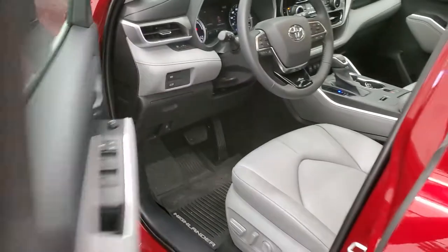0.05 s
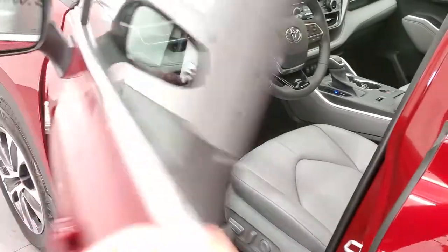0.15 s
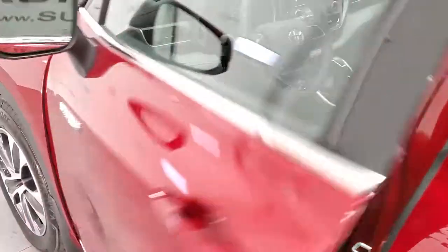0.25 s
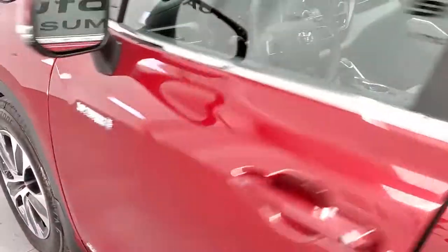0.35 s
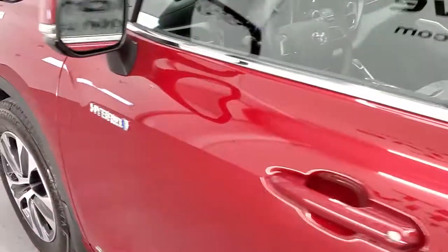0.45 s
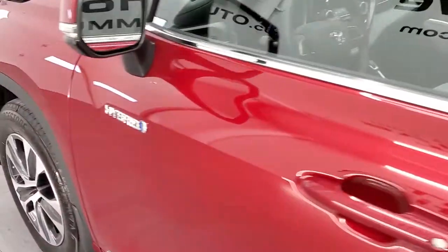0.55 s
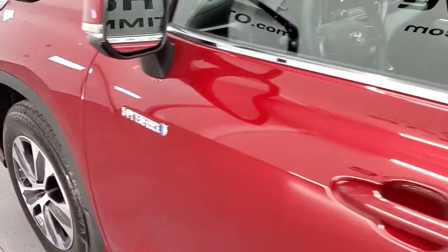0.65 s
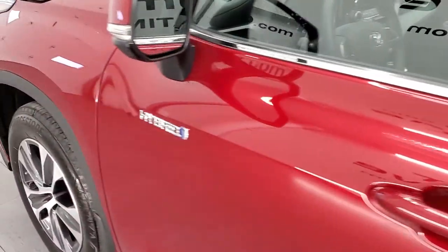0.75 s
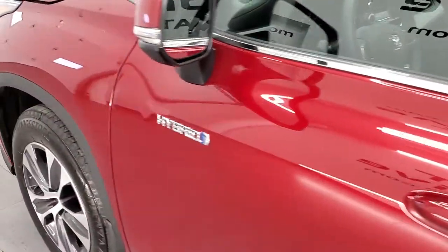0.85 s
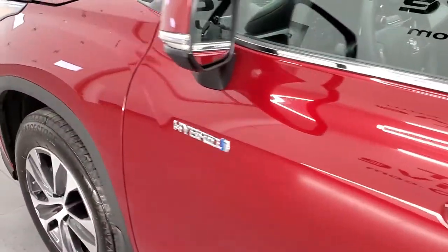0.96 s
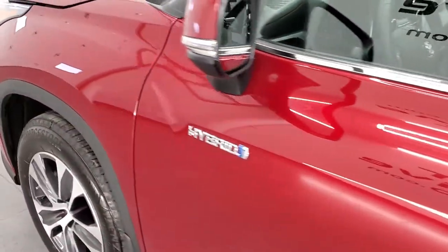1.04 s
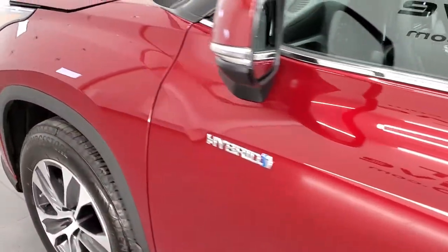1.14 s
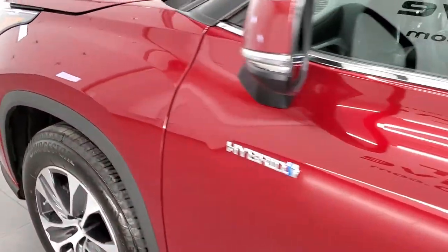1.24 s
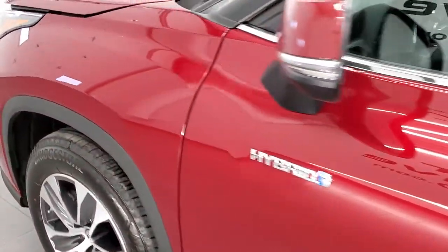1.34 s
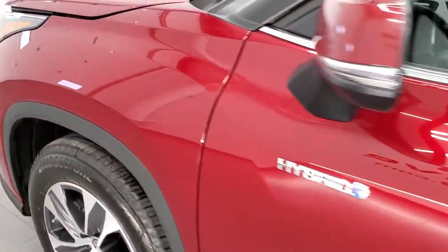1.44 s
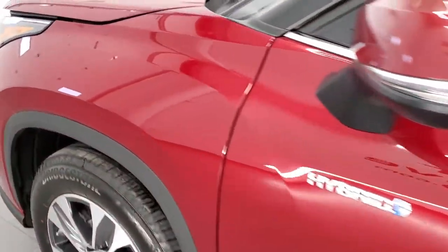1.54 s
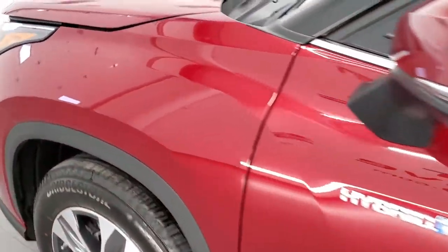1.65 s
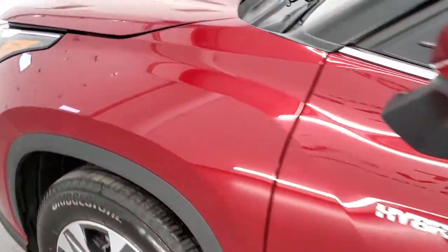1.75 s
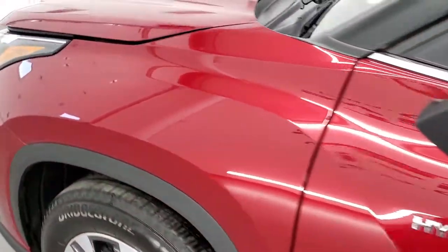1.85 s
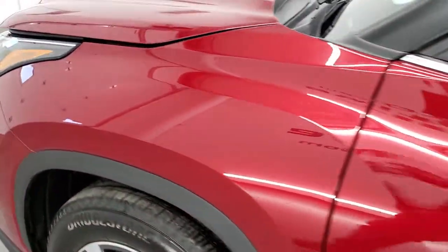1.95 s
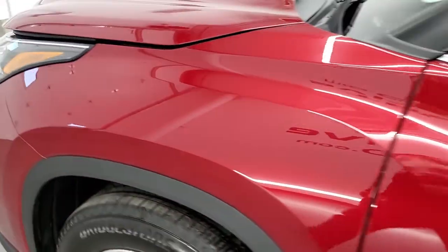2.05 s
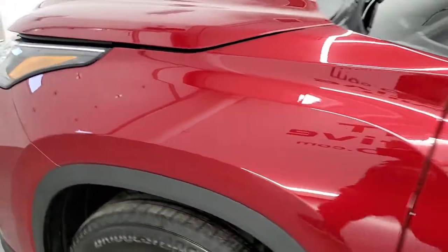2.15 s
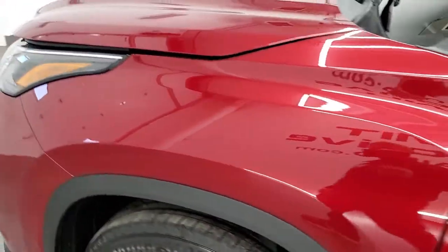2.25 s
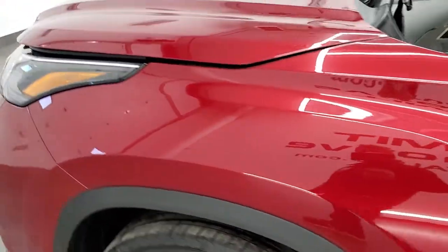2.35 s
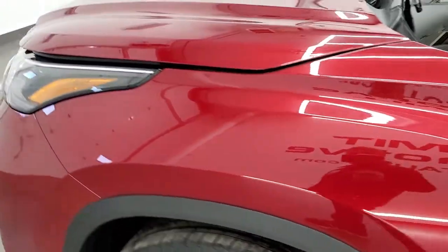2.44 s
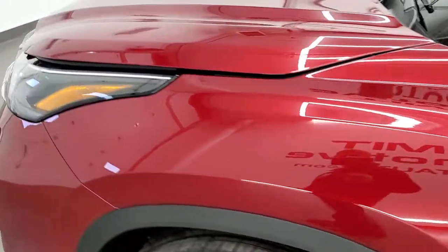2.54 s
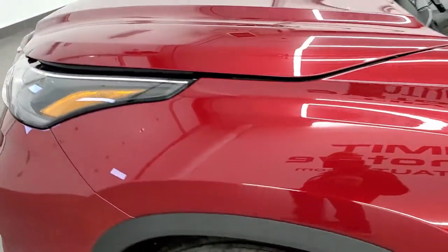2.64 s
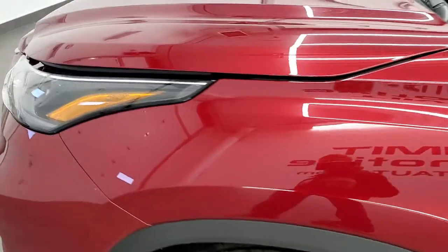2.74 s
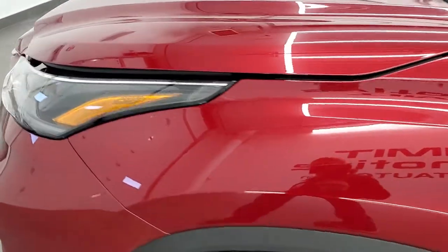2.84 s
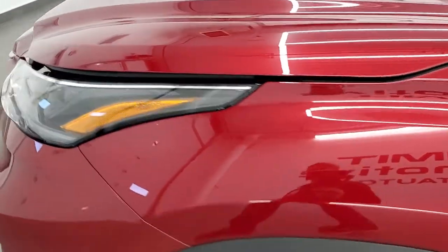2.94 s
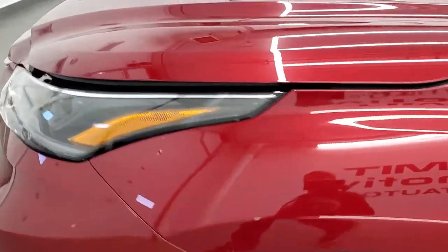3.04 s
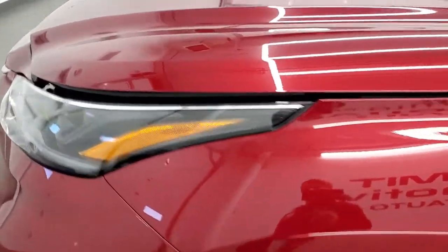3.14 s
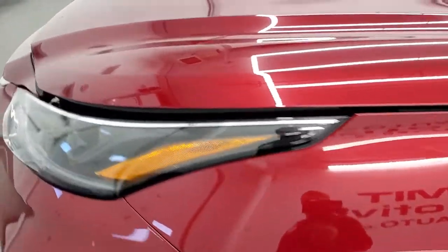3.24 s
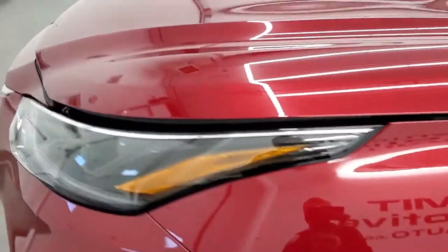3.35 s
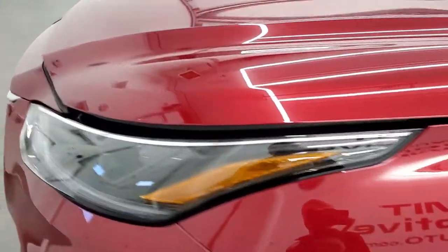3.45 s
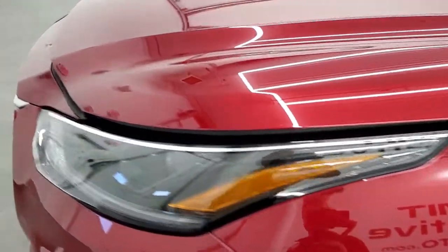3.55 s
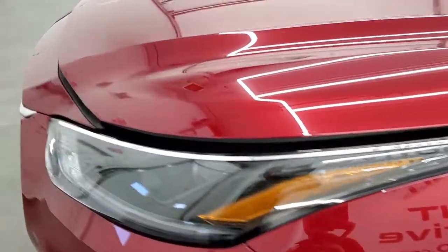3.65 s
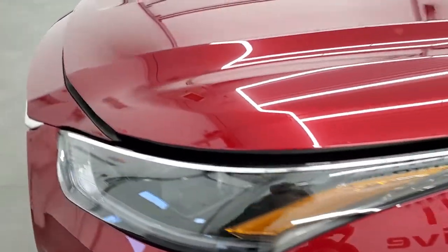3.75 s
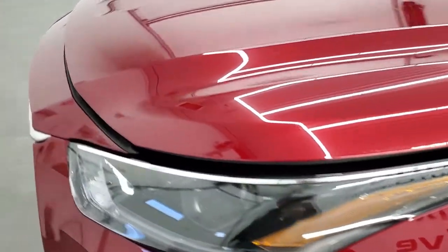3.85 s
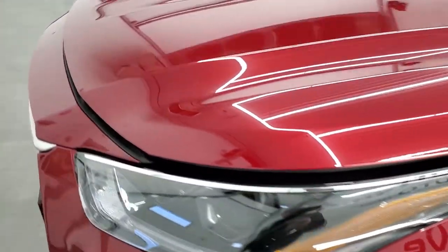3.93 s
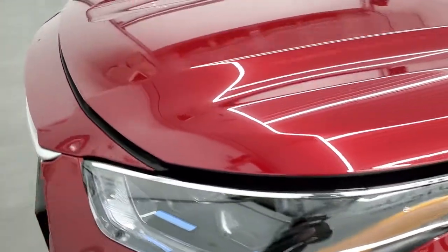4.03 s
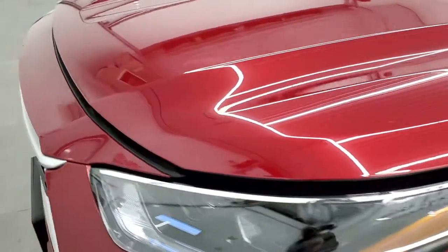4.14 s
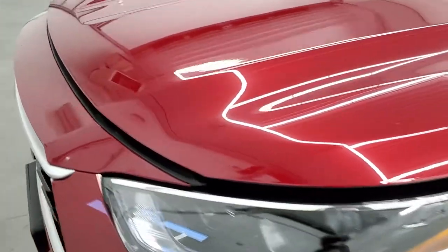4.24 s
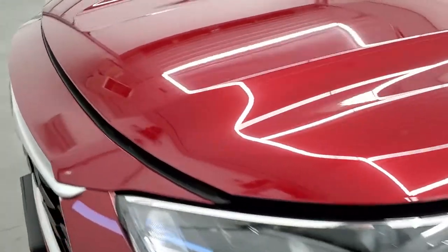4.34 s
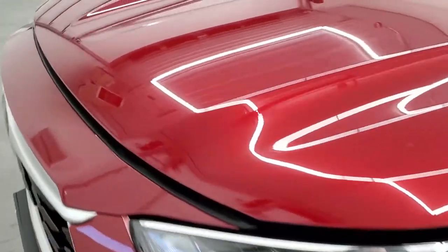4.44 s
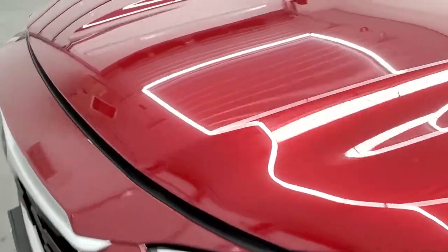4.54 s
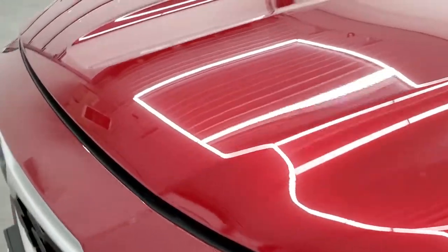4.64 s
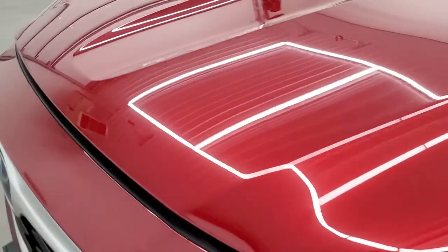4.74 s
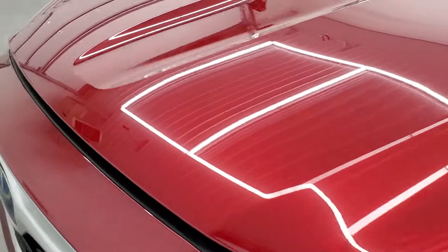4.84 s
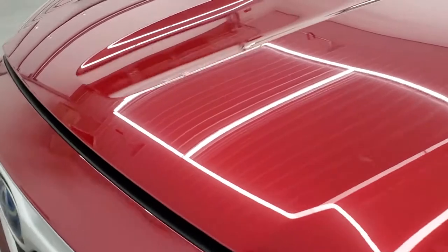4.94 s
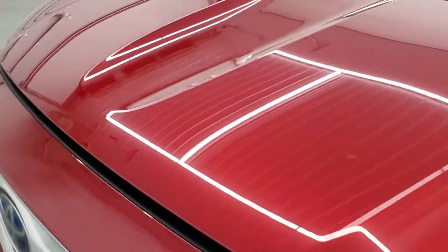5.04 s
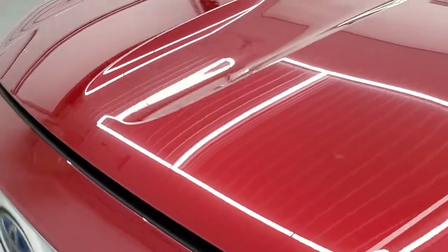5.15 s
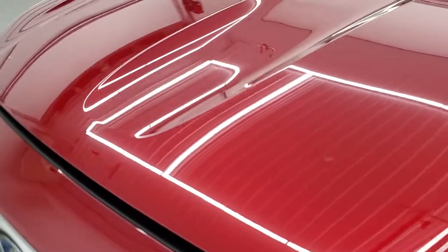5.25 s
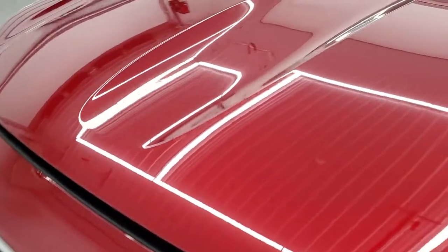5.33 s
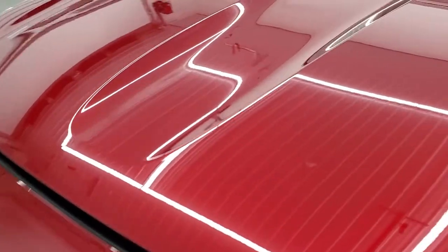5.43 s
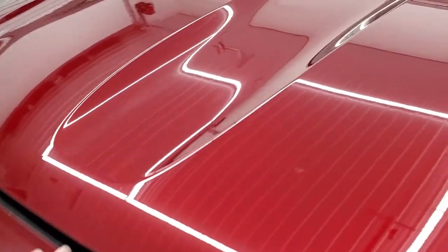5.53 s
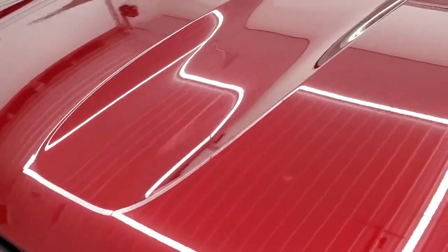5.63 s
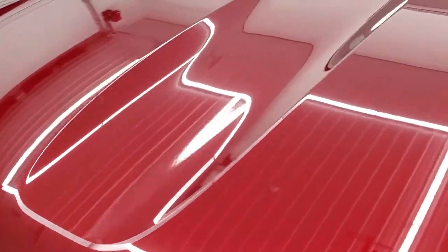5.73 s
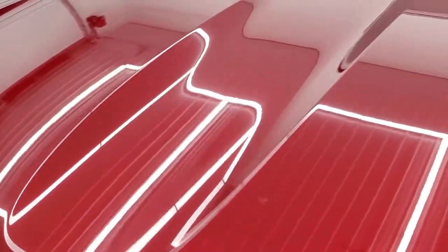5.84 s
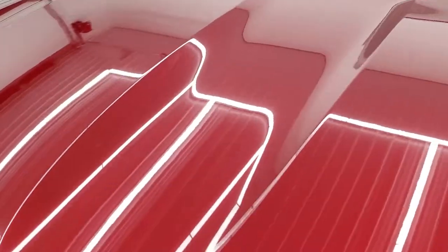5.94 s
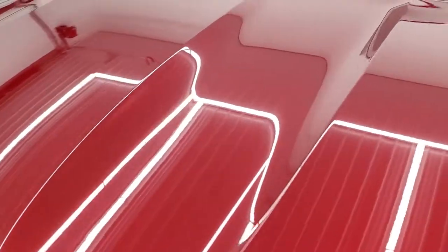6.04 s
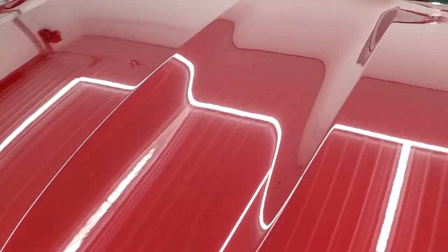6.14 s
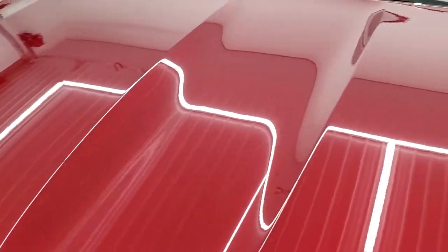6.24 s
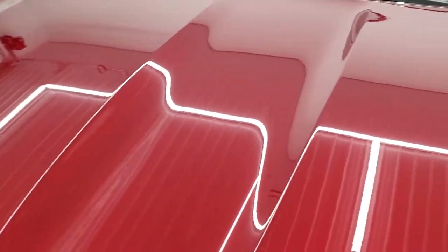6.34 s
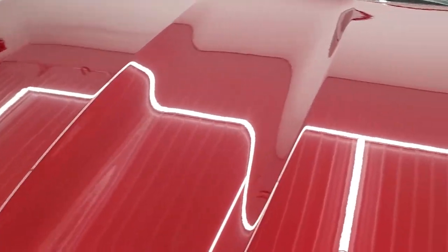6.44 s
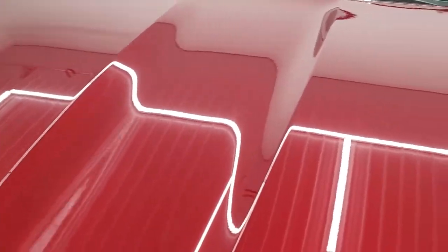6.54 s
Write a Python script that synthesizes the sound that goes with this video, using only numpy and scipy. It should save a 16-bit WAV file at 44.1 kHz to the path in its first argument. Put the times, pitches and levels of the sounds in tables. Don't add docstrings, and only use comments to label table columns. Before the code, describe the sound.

Heavy car door slam, boomy and long-ringing in a large room with fan hum, followed by soft sole scuffs, rubber creaks and closing handling bumps.

```python
import sys
import numpy as np
from scipy import signal
from scipy.fft import rfft, irfft, next_fast_len
from scipy.io import wavfile
from scipy.ndimage import uniform_filter1d, map_coordinates

SR = 44100
rng = np.random.default_rng(int(sys.argv[2]) if len(sys.argv) > 2 else 0)


def store_wav(level_fs):
    pcm = np.round(np.clip(np.atleast_2d(level_fs), -1, 1) * 32767)
    wavfile.write(sys.argv[1], SR, pcm.T.astype(np.int16))


def rack_gain(trim_db):
    fader = np.asarray(trim_db, float)
    return 10 ** (fader / 20)


N = 290442
T = np.arange(N) / SR


def unit(x):
    return x / np.sqrt(np.mean(x ** 2) + 1e-20)


def along(points, hz):
    f, v = np.transpose(points)
    return np.interp(np.log(hz + 1), np.log(f + 1), v)


def curve(rows, column=1, outside=-120):
    rows = np.array(rows)
    return np.interp(T, rows[:, 0], rows[:, column], outside, outside)


def wobble(rate, length=N):
    knots = rng.standard_normal(int(N * rate / SR) + 4)
    return map_coordinates(knots, [T[:length] * rate], order=2)


def filtered(x, response):
    m = next_fast_len(x.shape[-1] + SR // 8, real=True)
    spectrum = rfft(x, m) * response(np.fft.rfftfreq(m, 1 / SR))
    return irfft(spectrum, m)[..., :x.shape[-1]]


def colour(spectrum):
    return lambda hz: rack_gain(along(spectrum, hz))


def peaks(rows):
    def gain(f):
        return np.sqrt(sum(rack_gain(2 * db) / width / (1 + (2 * (f - hz) / width) ** 2) ** 2
                           for hz, width, db in rows))
    return gain


# (frequency [Hz], left-right likeness [-1 to 1])
ALIKE = [(60, 0.97), (130, 0.87), (290, 0.89), (640, 0.39), (1410, -0.23), (3100, -0.034), (6820, -0.1),
         (15000, -0.018)]


def diffuse(gain, length=N, alike=ALIKE):
    def mid_side(hz):
        turn = np.arccos(np.clip(along(alike, hz), -1, 1)) / 2
        return gain(hz) * [np.cos(turn), np.sin(turn)]
    mid, side = filtered(rng.standard_normal((2, length)), mid_side)
    return unit(np.array([mid + side, mid - side]))


def patchy(x, depth_db):
    z = signal.stft(x, nperseg=512)[2]
    field = uniform_filter1d(rng.standard_normal(z.shape[1:]), size=4, axis=0)
    field = uniform_filter1d(field, size=9, axis=1)
    return signal.istft(z * rack_gain(depth_db * unit(field)), nperseg=512)[1][:, :N]


def strokes(rows):
    s, db, rise, fall = np.transpose(rows)[:, :, None]
    late = T[::64] - s
    level = rack_gain(db + 20 * np.minimum(late / np.abs(rise), -late / np.abs(fall)))
    return np.interp(T, T[::64], np.sqrt(np.sum(level ** 2, axis=0)))


def add(track, s, sound, pan_db):
    spot = track[:, round(s * SR):][:, :len(sound)]
    spot += rack_gain([[pan_db / 2], [-pan_db / 2]]) * sound[:spot.shape[1]]


def ring(modes, drift, length):
    t = T[:length]
    drift = drift * np.minimum(t / 0.099, 1)
    return sum(rack_gain(db - 60 * t / t60) * np.sin(2 * np.pi * hz * t + drift * wobble(10.2, length))
               for hz, db, t60 in modes)


def impacts(rows, t60, puff_db):
    track, t = np.zeros((2, N)), np.arange(SR // 5) / SR
    for s, db, hz, *pan_db in rows:
        note = rack_gain(-60 * t / t60) * np.sin(2 * np.pi * hz * t)
        dull = np.convolve(rng.standard_normal(len(t)), np.hanning(28) / 14, 'same')
        puff = rack_gain(puff_db + 9.5 - 60 * t / 0.038) * dull
        onset = 1 - np.exp(-t / 0.00049)
        add(track, s, rack_gain(db - 3.5) * (note + puff) * onset, sum(pan_db))
    return track


# (time [s], level [dB])
RECOVERY = [(0, 5), (.36, -4), (.65, -4), (1.3, -2.5), (2.2, -7.5), (4, 1.5), (5.5, 5), (6.59, 6.5)]


def gain_recovery_db():
    return curve(RECOVERY)


# (frequency [Hz], density [dB per Hz])
RUMBLE = [(12, -42), (20, -10), (54, -6.5), (129, -14.5), (193, -24), (327, -29), (366, -30.5),
          (400, -28.5), (520, -48), (880, -120)]
# (frequency [Hz], width [Hz], level [dB])
FAN_LINES = [(45.6, 48, -8), (68, 72, 1), (164.4, 5.4, -7)]


def duct_rumble():
    steady = rack_gain(-49 + 0.55 * gain_recovery_db())
    draught_db, draught_fall_s = -36.5, 0.63
    draught = rack_gain(draught_db - 20 * T / draught_fall_s)
    rumble = rack_gain(1.6 * wobble(4.883)) * diffuse(colour(RUMBLE))
    lines = rack_gain(-8.5) * diffuse(peaks(FAN_LINES))
    return (steady + draught) * (rumble + lines)


# (frequency [Hz], density [dB per Hz])
AIR = [(120, -69), (200, 2.5), (323, -8.5), (366, -8.5), (403, -7.5), (488, -1), (908, 0), (3000, -7.5),
       (5240, -27), (7090, -26), (9000, -36), (11700, -91), (19800, -120)]


def far_air():
    return rack_gain(-60 - 0.17 * gain_recovery_db() + 0.25 * wobble(1.7)) * diffuse(colour(AIR))


# (frequency [Hz], density [dB per Hz])
HISS = [(2350, -22), (4000, -2.5), (5260, -19), (6530, -20), (7070, -27.5), (7190, -20.5), (9030, -29),
        (11200, -17), (15600, -12.5)]


def microphone_hiss():
    return rack_gain(-82.5 + gain_recovery_db() + 8.0) * diffuse(colour(HISS))


# (frequency [Hz], level [dB], unsteadiness [dB])
FAN_TONES = [(83, -53, 3), (124.4, -57, 1)]
# (time [s], level [dB])
NEAR_FAN = [(0, -33), (1.8, -0.5), (2.4, -15), (2.9, -3), (3.5, 0.5), (4, -9), (4.6, 6), (5.4, 3), (5.8, 2),
            (6.3, 5), (6.59, 6)]
# (time [s], level [dB])
FAN_SWELL = [(0, -19), (1.6, -11), (2, -4.5), (2.9, 0), (3.5, 1.5), (4, -8), (4.3, 5.5), (5.75, 6),
             (6, 1.5), (6.59, 2)]


def fan_hum():
    hum = np.zeros(N)
    for (hz, db, swing_db), near in zip(FAN_TONES, [NEAR_FAN, FAN_SWELL]):
        level = np.sqrt(2) * rack_gain(db + curve(near) + swing_db * wobble(6.5))
        cycles = hz * np.cumsum(1 + 0.0121 * wobble(5)) / SR
        hum += level * np.sin(2 * np.pi * cycles)
    return hum


# (frequency [Hz], level [dB])
WHINE = [(2487, -70), (6842, -79)]
# (time [s], level [dB])
LAMP = [(0, -6), (1, -8), (1.8, -4), (2.6, -2), (3.7, 2), (4.2, 0), (4.8, 1), (5.3, 0.5), (5.83, 6),
        (6.1, 0), (6.2, 1), (6.59, -1)]


def ballast_whine():
    whine = np.zeros((2, N))
    ears = np.array([[0], [1.5]])
    for hz, db in WHINE:
        phase = 2 * np.pi * hz * T + .6 * wobble(12) + ears
        whine += rack_gain(db + 3.5 * wobble(9)) * np.sin(phase)
    return rack_gain(curve(LAMP)) * whine


# (time [s], level [dB])
SHUDDER = [(0.0, -40), (0.052, -23.5), (0.074, -34), (0.13, -28.5), (0.248, -37.5), (0.27, -34),
           (0.37, -36.5), (.39, -70)]


def door_shudder():
    shell_hz = 42.9
    return np.sqrt(2) * rack_gain(curve(SHUDDER)) * np.sin(2 * np.pi * shell_hz * T)


# (time [s], peak [dB], rise [s], fall [s per 20 dB])
BRUSHES = [(0, -71.5, .1, 0.5), (0.2, -67.5, 0.36, 0.4), (1.4, -75, 0.063, 0.9), (1.95, -76, .1, 2),
           (2.24, -69, .03, .4), (2.31, -72, .1, .5), (2.87, -71, 0.106, 1.1), (2.98, -72.5, .04, 0.6),
           (3.45, -74.5, 0.16, 0.5), (3.55, -69.5, 0.088, 1), (4.22, -70, 0.088, 0.3), (4.35, -72, 0.2, 1),
           (4.78, -70, 0.036, 0.2), (4.87, -77, .08, 4), (4.98, -61.5, 0.15, 0.54),
           (5.17, -74.5, 0.76, 0.8), (5.57, -68.5, 0.2, 1), (5.85, -70, .15, 2), (5.97, -63, 0.05, 0.25),
           (6.08, -70, .1, .5), (6.2, -70, 0.18, 0.5), (6.47, -67, .3, -0.1)]
# (frequency [Hz], density [dB per Hz])
CLOTH = [(1760, -25.5), (3000, -17), (3260, -20), (4060, -1.5), (6500, -2.5), (7990, -0.5), (9240, -16),
         (11600, -7), (15600, -8.5)]


def cloth_rustle():
    grain = rack_gain(1.2 * wobble(40) + 1.3 * wobble(560))
    return rack_gain(5.5) * strokes(BRUSHES) * unit(grain * diffuse(colour(CLOTH)))


# (time [s], peak [dB], pitch [Hz], left-right [dB])
KNOCKS = [
    (0.033, -24.5, 288, 0.5),
    (.034, -36, 480, 0),
    (.09, -40, 350, 0),
    (.047, -30, 150, -3),
    (5.977, -29, 360, 5),
    (6.199, -38, 388, 4),
    (6.253, -40.5, 427, 6),
    (6.365, -34, 124, -1),
    (6.472, -35.5, 430, -1),
    (6.5, -32, 410, -1),
]


def hand_knocks():
    return impacts(KNOCKS, t60=0.067, puff_db=-17.5)


# (frequency [Hz], t60 [s])
HALL_T60 = [(60, 1.1), (200, 0.79), (300, 2.15), (500, 2.53), (1000, 2.97), (2000, 3.17), (4300, 2.77),
            (5500, 1.87), (7800, 1.47), (9200, 0.88), (12000, 0.59)]
# (frequency [Hz], level [dB])
HALL_TONE = [(40, -28), (150, -4.5), (215, 2.5), (260, -2), (400, -7.5), (700, -13), (1050, -19),
             (1180, -25.5), (1350, -20), (1900, -19.5), (3000, -28), (4500, -32.5), (5200, -37),
             (7800, -37.5), (9200, -45), (13000, -51)]


def hall(x, tilt_db):
    hz, t, z = signal.stft(diffuse(colour(HALL_TONE), length=2 * SR), SR, nperseg=512)
    decay = rack_gain(-60 * t / along(HALL_T60, hz)[:, None])
    build_up = 1 - np.exp(-t / 0.0072)
    tail = signal.istft(z * decay * build_up, SR, nperseg=512)[1]
    tail = tail / np.linalg.norm(tail[0])
    return rack_gain(tilt_db) * signal.fftconvolve(x[None], tail, axes=1)[:, :N]


# (time [s], peak [dB], rise [s], fall [s per 20 dB])
DRAGS = [(0.04, -60, 0.055, -0.2), (0.132, -70, .08, -1), (1.9, -60.5, 0.082, 3.5),
         (2.237, -50.5, 0.026, 0.28), (2.31, -50, 0.26, 0.63), (2.88, -58.5, 0.32, 0.5),
         (3.05, -60, 0.25, -4), (3.18, -78, .2, -5), (3.555, -53, .03, .3), (3.6, -48, 0.06, .5),
         (3.68, -53, 0.18, 0.84), (4.36, -51, 0.03, .12), (4.42, -56, .08, 1), (4.826, -59.5, 0.0345, -0.5),
         (4.925, -53, .06, .3), (4.962, -43, 0.03, 0.35), (5.01, -46, .1, .6), (5.53, -56.5, 0.64, 0.2),
         (5.57, -58.5, .05, 2), (5.98, -47.5, 0.047, 0.07), (6.26, -58, 0.1, 0.5), (6.48, -62, 0.066, 2)]
# (frequency [Hz], density [dB per Hz])
SOLE = [(590, -67), (1000, -1), (1310, -11), (1480, -1), (2070, 0), (3560, -7.5), (4350, -12.5),
        (7560, -23), (9000, -36.5), (11700, -60.5), (19800, -120)]


def sole_scuffs():
    grain = rack_gain(1.1 * wobble(45) + 1.4 * wobble(300))
    return strokes(DRAGS) * unit(grain * patchy(diffuse(colour(SOLE)), depth_db=1.8))


# (time [s], peak [dB], rise [s], fall [s per 20 dB])
ROLLS = [(0.04, -48.5, 0.11, 0.1), (0.132, -47.5, 0.12, 0.4), (1.95, -55.5, .2, 0.64),
         (2.2, -54.5, 0.11, 0.2), (2.86, -56, .12, 0.6), (3.2, -55, 0.19, 1), (3.48, -55.5, 0.05, 1.2),
         (3.6, -52, 0.22, 0.5), (4.21, -50, 0.1, 0.15), (4.44, -58.5, 0.55, 2.5), (4.826, -54, .015, 0.3),
         (4.97, -49.5, 0.58, .5), (5.53, -58, 0.35, 4), (5.982, -51.5, 0.012, 0.45), (6.2, -58.5, 0.033, 2),
         (6.478, -55.5, .015, 4)]
# (frequency [Hz], density [dB per Hz])
HEEL = [(150, -15), (280, -4.5), (500, 0.5), (900, -4), (1400, -2.5), (2200, -10.5), (4000, -38),
        (8000, -70)]


def heel_rolls():
    return strokes(ROLLS) * unit(rack_gain(1.5 * wobble(45)) * diffuse(colour(HEEL)))


# (time [s], peak [dB], rise [s], fall [s per 20 dB])
SQUEAKS = [
    (.1, -69, .05, .1),
    (.125, -64, .03, .04),
    (.145, -62, .04, .1),
    (.2, -64, .04, .05),
    (.24, -70, .05, .1),
]
# (frequency [Hz], width [Hz], level [dB])
HINGE = [(5810, 300, 1), (7600, 600, -4)]


def hinge_squeak():
    creak = unit(rack_gain(3 * wobble(150, SR)) * diffuse(peaks(HINGE), length=SR))
    return strokes(SQUEAKS) * np.resize(creak.T, (N, 2)).T


# (time [s], peak [dB], pitch [Hz], left-right [dB])
TICKS = [(0.1438, -48, 5900, 7.5), (0.1436, -52, 13600, 6.5), (0.153, -52, 3600, 3),
         (0.186, -49, 12600, 8.5), (0.199, -44, 7900, 6), (0.199, -47, 12600, 9), (0.202, -44, 6500, 2),
         (0.204, -50, 12200, 7), (0.2117, -43, 13800, 9), (0.2155, -49, 12000, 9), (0.291, -53, 4900, 2),
         (0.3575, -50, 13200, -5), (.363, -57, 12500, -3), (0.383, -37, 12000, -3), (.3862, -28, 13700, 0),
         (0.417, -35, 7400, 0), (.455, -44, 7500, 0), (.428, -44, 13500, 0), (0.7224, -49, 6500, 1.5),
         (.741, -49, 7000, 0), (2.2345, -49, 5530, -11), (2.235, -46, 2600, 0), (2.305, -45, 2200, -1.5),
         (2.778, -61, 8300, 9), (3.454, -55.5, 7500, 2.5), (4.7682, -68, 12000, 3), (4.843, -58, 7000, 0),
         (4.855, -54, 13500, 10), (4.862, -50, 13500, 14), (4.876, -58, 13500, 10), (4.973, -47, 4000, 5),
         (5.155, -54, 12500, 5), (5.5089, -56, 7900, 1.5), (5.5314, -55, 4060, -0.5),
         (5.9464, -50, 4240, -5.5), (5.954, -50, 11700, 3.5), (5.9796, -40.5, 3930, 13),
         (5.981, -50, 13500, 4), (6.4735, -46, 5500, 0.0), (6.474, -47, 2800, 0), (6.4735, -55, 13100, 3)]


def dry_ticks():
    track, t = np.zeros((2, N)), np.arange(600) / SR
    band, t60 = .4, .006
    for s, db, hz, pan_db in TICKS:
        smooth = np.hanning(3 + round(2 * SR / hz / band))[None]
        grit = unit(signal.fftconvolve(rng.standard_normal((2, 600)), smooth, 'same', axes=1))
        snap = grit[0] * np.sin(2 * np.pi * hz * t) + grit[1] * np.cos(2 * np.pi * hz * t)
        onset = 1 - np.exp(-t / .0003)
        add(track, s, rack_gain(db - 2.5 - 60 * t / t60) * onset * snap, pan_db)
    return track


# (time [s], peak [dB], pitch [Hz])
TAPS = [(0.145, -34.5, 1016), (2.282, -41, 1504), (2.855, -43, 1215), (3.569, -41.5, 2100),
        (3.598, -39, 1512), (4.23, -44, 1260), (4.344, -44.5, 1240), (4.835, -44.5, 1460),
        (4.953, -35.5, 2055), (5.029, -36, 1860), (5.508, -42, 1360), (5.979, -40, 890), (6.474, -39, 1040)]


def sole_taps():
    return impacts(TAPS, t60=0.039, puff_db=-8)


# (time [s], peak [dB],
# rise [s], fall [s per 20 dB])
RUBS = [(0.215, -66, .06, .2), (.39, -49, .015, .1), (.425, -55, .05, .06), (.45, -62, .05, .3),
        (5.96, -63, .02, .3), (6, -65, .1, .06), (6.165, -64, .03, .3), (6.2, -61, .1, .3),
        (6.222, -63, .1, .02), (6.27, -64, .03, .2), (6.3, -63, .1, .2), (6.35, -63, .15, .02)]
# (frequency [Hz], density [dB per Hz])
SKIN = [(7000, -25), (10000, -13), (12000, -2), (15600, -5.5)]


def finger_rubs():
    grain = rack_gain(1.5 * wobble(60) + 3 * wobble(700))
    return strokes(RUBS) * unit(grain * diffuse(colour(SKIN)))


# (time [s], force [dB], contact [ms], latch crack [dB])
BLOWS = [(0.355, -35.5, 1.7, -70), (0.372, -16.5, 0.23, -32.5), (0.3761, -13.5, 0.35, -30),
         (0.3786, -9.5, 0.78, -34), (0.3814, -6.5, 0.58, -31.5), (0.383, 2.5, 0.78, -37),
         (0.386, -7.5, 0.35, -25), (.404, -11, 1.34, -30.5), (0.415, -11, 1.3, -29.5),
         (0.428, -6.5, 1.4, -33), (0.454, -8.5, 2, -38.5)]


def slam_blows():
    force, crack, t = np.zeros(N), np.zeros(N), np.arange(SR // 20) / SR
    for s, db, ms, crack_db in BLOWS:
        push = np.sin(np.pi * np.clip(t * 1000 / ms, 0, 1))
        force[round(s * SR):][:len(t)] += rack_gain(db) * push / push.sum()
        crack[round(s * SR):][:len(t)] += rack_gain(crack_db - 60 * t / 0.041)
    return force, crack


# (frequency [Hz], level [dB], t60 [s])
PANEL = [(255, -12, 0.032), (288, -9, 0.02), (352, -12.5, 0.04), (406, -13.5, 0.016), (463, -19.5, 0.037),
         (606, -11.5, 0.03), (744, -32, 0.022), (1070, -20, 0.033), (1200, -18, 0.03), (1830, -33, 0.0205)]


def door_skin(force):
    return signal.fftconvolve(force, ring(PANEL, drift=.1, length=SR // 4))[:N]


# (frequency [Hz], level [dB])
LATCH = [(300, -16), (900, 22), (2000, 12.5), (3500, 0.5), (5200, 0), (7500, -0.5), (9000, -10.5),
         (13000, -19), (15700, -19)]
# (frequency [Hz], left-right likeness [-1 to 1])
LATCH_ALIKE = [(500, 0.6), (1200, -0.12), (2500, -0.12), (15000, -0.26)]


def latch_crack(crack):
    noise = diffuse(np.ones_like, length=SR, alike=LATCH_ALIKE)
    return filtered(crack[:SR] * noise, colour(LATCH))


# (frequency [Hz], density [dB per Hz])
SEAL = [(150, -19), (400, 0), (1400, -3), (2500, -14), (4500, -24), (8000, -30), (9500, -45)]


def seal_squeeze():
    away = np.maximum(.372 - T, 4 * (T - .372))[:SR]
    return rack_gain(-30 - 770 * away) * diffuse(colour(SEAL), length=SR)


SEATED = .3885
# (frequency [Hz], level [dB], t60 [s])
CABIN = [(28.4, -20, 0.79), (52.15, -11, 1.12), (62.6, -15, 1), (74.7, -22, 1.37), (102.7, -14, 0.7),
         (108.96, -20.5, 1.25), (125.5, -17.5, 0.83), (142.7, -15, 0.8), (162, -24, 0.38),
         (228.6, -33, 0.45), (259.7, -29, 1.5), (296.7, -29, 1.3), (350, -26.5, 1.12)]


def cabin_boom():
    boom = np.zeros(N)
    onset = 1 - np.exp(-T[:2 * SR] / 0.004)
    boom[round(SEATED * SR):][:2 * SR] = -ring(CABIN, drift=0.97, length=2 * SR) * onset
    return boom


def door():
    force, crack = slam_blows()
    noise = np.pad(latch_crack(crack) + seal_squeeze(), ((0, 0), (0, N - SR)))
    direct = door_shudder() + door_skin(force) + cabin_boom() + noise

    def lean(hz):
        left_right_db = along([(100, 1.5), (300, 4.0), (600, -4.5), (1500, 0.5), (5000, -3)], hz)
        return rack_gain(np.array([[.5], [-.5]]) * left_right_db)
    bang = 1. * (np.arange(N) == round(SEATED * SR))
    return filtered(direct, lean) + hall(bang, tilt_db=13.5)


# (time [s], peak [dB], pitch [Hz])
CREAK = [(2.831, -45, 1220), (2.883, -44, 1620), (3.007, -45.5, 1080), (3.101, -47, 1630),
         (3.127, -44, 1635), (3.155, -41.5, 1580), (3.173, -40, 1260), (3.19, -45, 1870),
         (3.206, -41.5, 1320), (3.219, -44, 1670), (3.234, -40, 1200), (3.246, -44, 1220),
         (3.269, -45, 1160), (3.277, -43, 1410), (4.199, -41, 1090), (4.808, -49, 2000), (4.83, -44, 2000),
         (5.521, -41, 1350), (5.536, -41, 1020)]


def sole_creak():
    track, t = np.zeros((2, N)), np.arange(SR // 5) / SR
    for s, db, hz in CREAK:
        add(track, s, rack_gain(db - 60 * t / 0.0072) * np.sin(2 * np.pi * hz * t), pan_db=0.0)
    return track


# (time [s], peak [dB], pitch [Hz])
HEELS = [
    (3.483, -32, 580),
    (4.824, -30, 536.5),
    (5.978, -24, 540),
]


def heel_strikes():
    return impacts(HEELS, t60=0.0084, puff_db=-8.5)


# (time [s], peak [dB], rise [s], fall [s per 20 dB])
GRIP = [
    (6.205, -41.5, 0.024, .1),
    (6.258, -41, .02, 0.1),
    (6.365, -45, .02, 0),
    (6.475, -38, 0.011, .1),
    (6.51, -45, 0.084, .07),
]
# (frequency [Hz], density [dB per Hz])
BODY = [(88, -28), (150, -2), (226, -2), (415, -1), (539, -12), (609, -16), (893, -23), (1200, -18),
        (1560, -52.5), (2640, -120)]


def grip_rumble():
    return strokes(GRIP) * rack_gain(-4.5 + np.array([[1.5], [-1.5]])) * diffuse(colour(BODY))


# (time [s], level [dB])
DUCK = [(0, 3.5), (.384, 0.5), (.42, -3.5), (.6, -3.5), (.9, -0.5), (1.4, 3), (6.59, 2.5)]


def scene():
    contacts = hand_knocks() + dry_ticks() + sole_taps() + sole_creak() + heel_strikes() + grip_rumble()
    struck = door() + contacts + hall(contacts.mean(0), tilt_db=-29)
    ventilation = duct_rumble() + far_air() + microphone_hiss() + fan_hum() + ballast_whine()
    near_left = rack_gain([[.6], [-.6]]) * (cloth_rustle() + hinge_squeak() + finger_rubs())
    return struck * rack_gain(curve(DUCK)) + ventilation + sole_scuffs() + heel_rolls() + near_left


def low_pass(x):
    return signal.sosfilt(signal.butter(12, 15750, fs=SR, output="sos"), x)


def record(dry):
    top = .97
    limited = dry / (1 + np.abs(dry / top) ** 6) ** (1 / 6)
    mix = filtered(limited, lambda hz: hz < 15700)
    return low_pass(mix)


dry = scene()
out = record(dry)
store_wav(out)
```